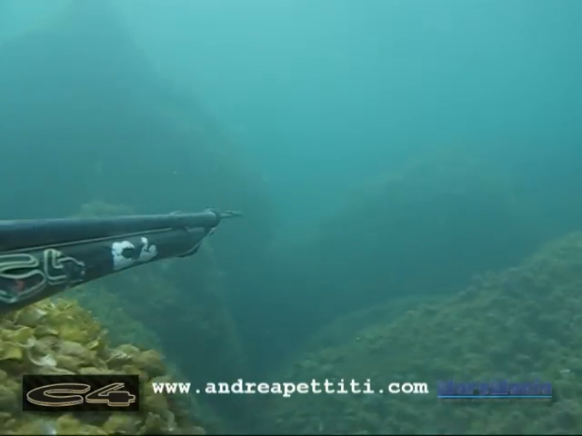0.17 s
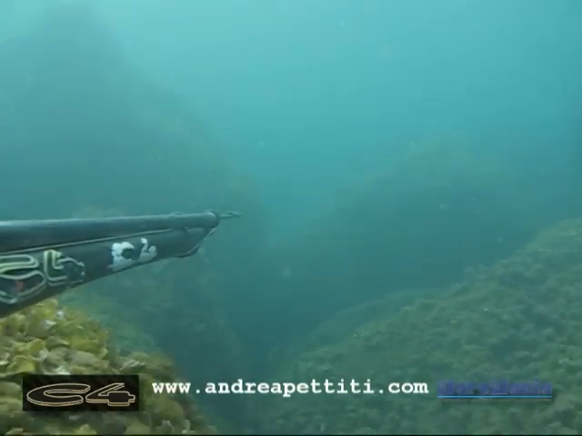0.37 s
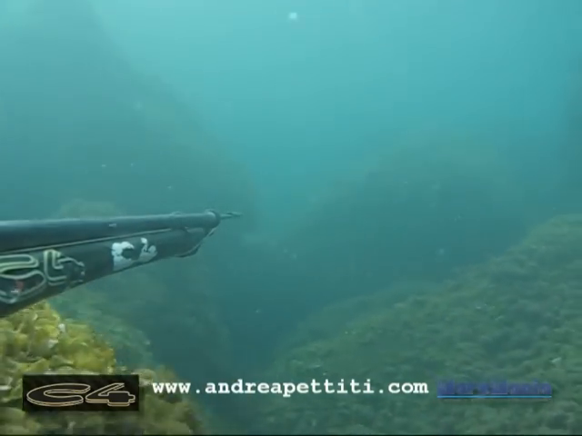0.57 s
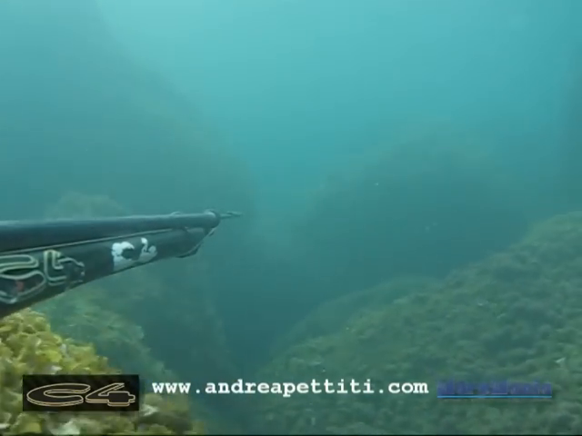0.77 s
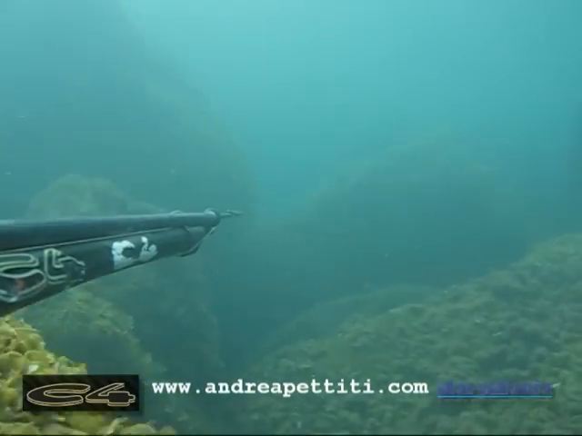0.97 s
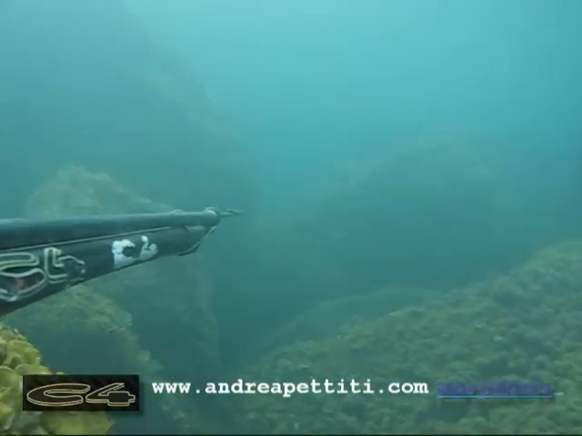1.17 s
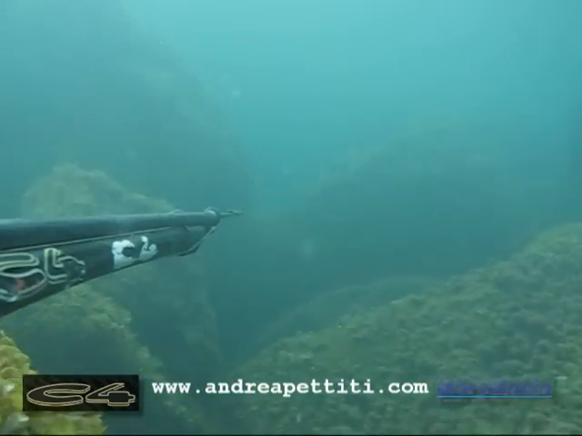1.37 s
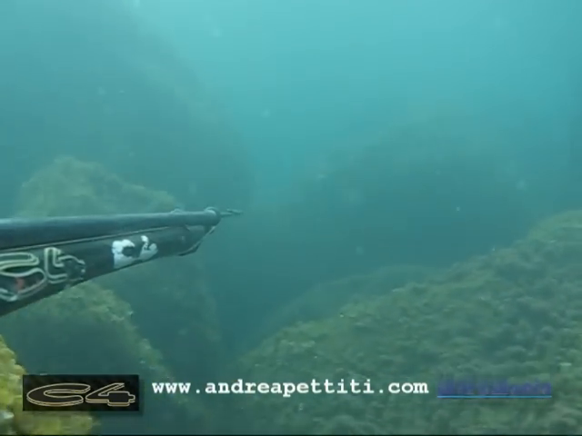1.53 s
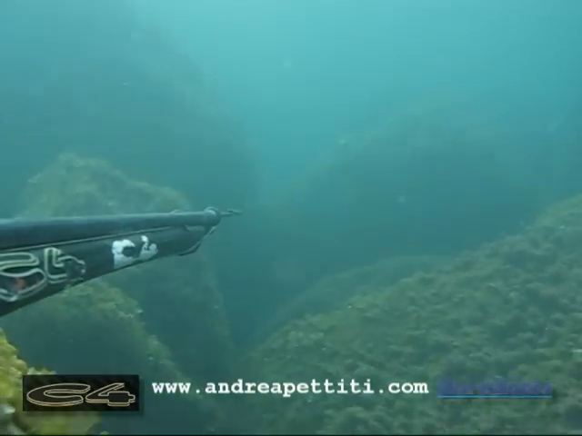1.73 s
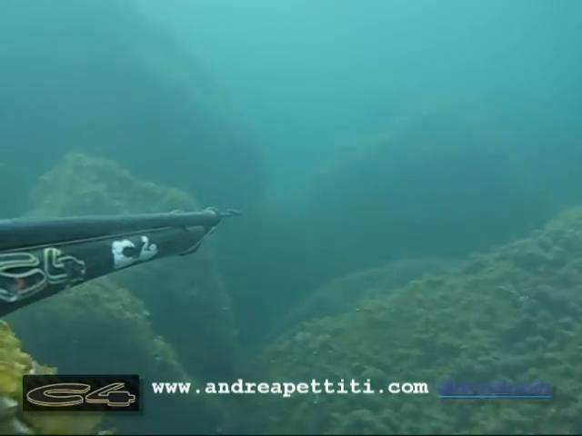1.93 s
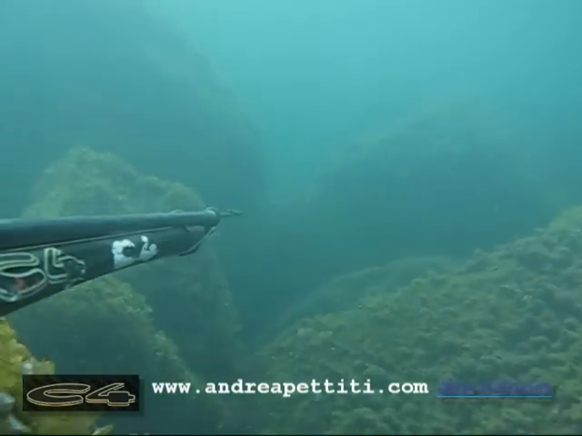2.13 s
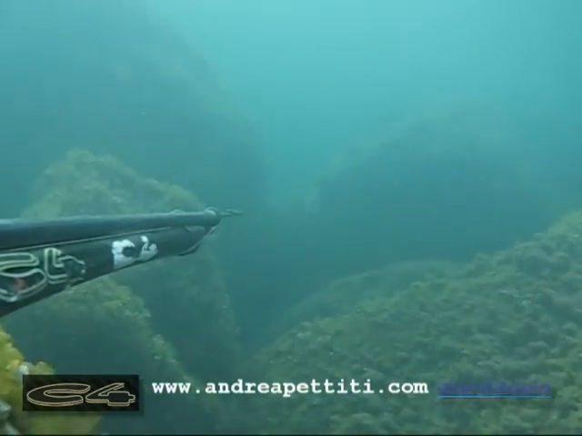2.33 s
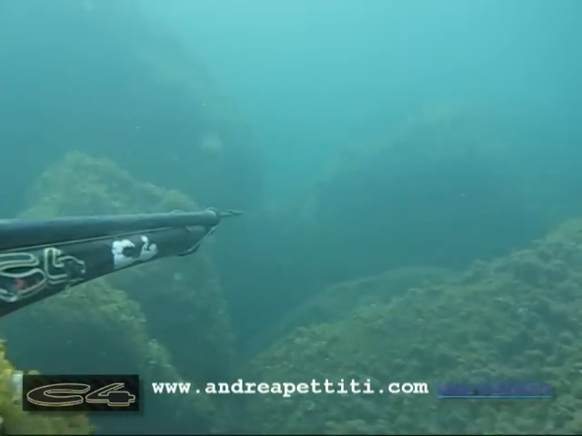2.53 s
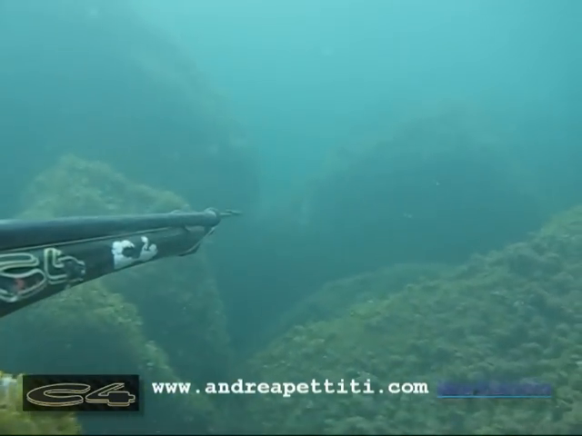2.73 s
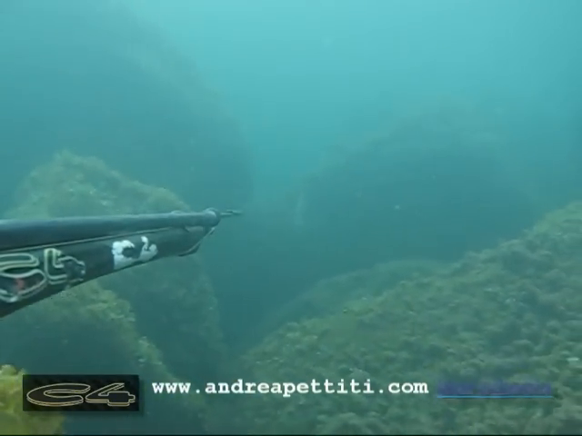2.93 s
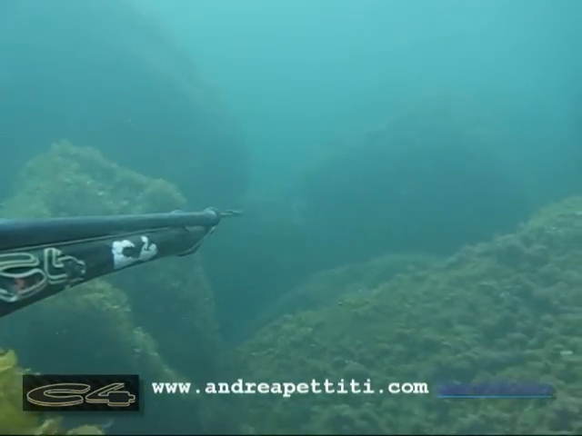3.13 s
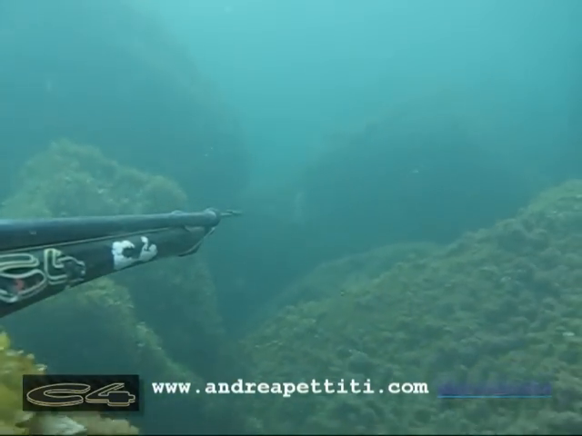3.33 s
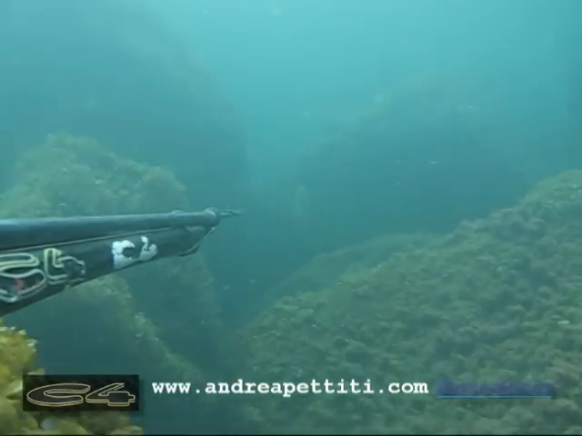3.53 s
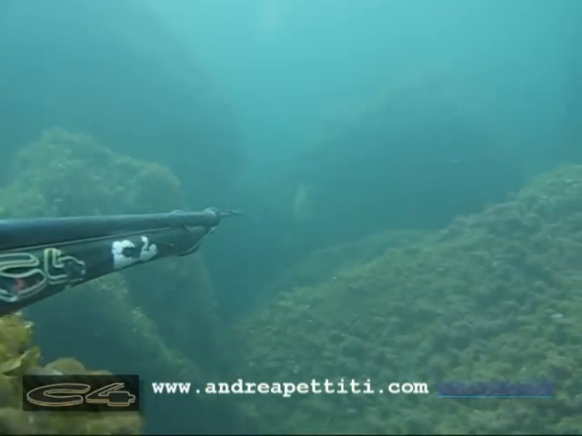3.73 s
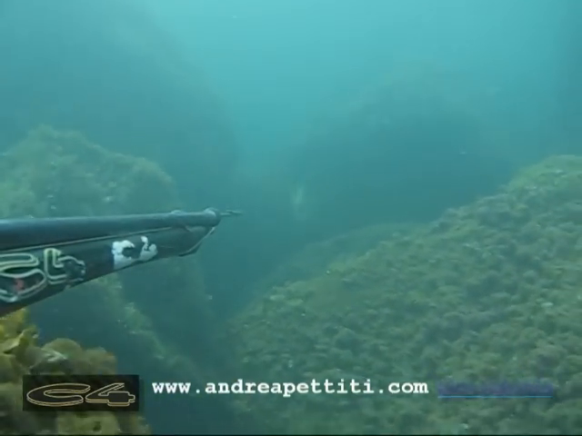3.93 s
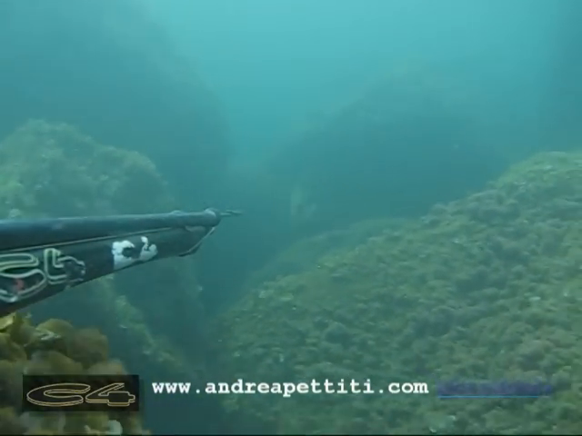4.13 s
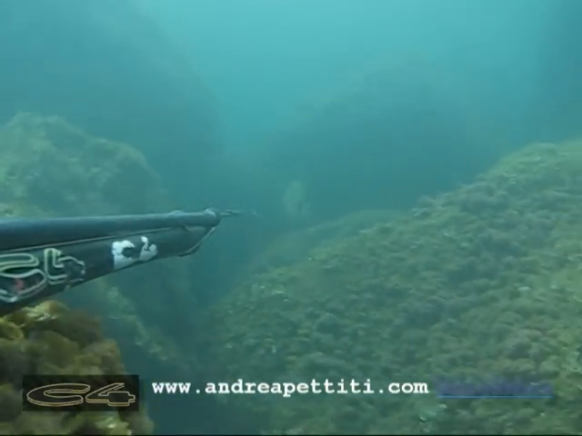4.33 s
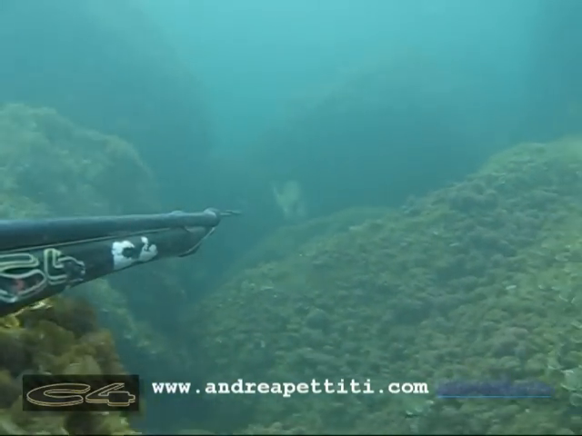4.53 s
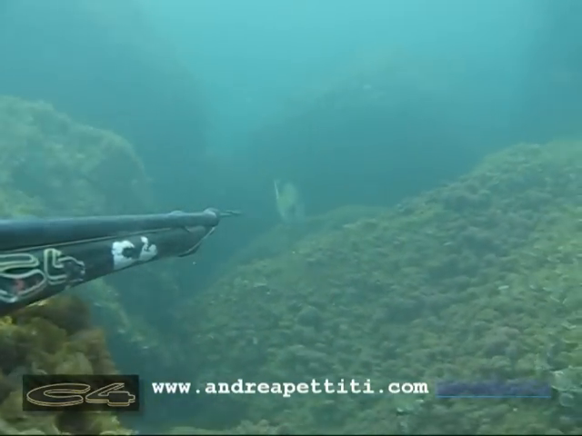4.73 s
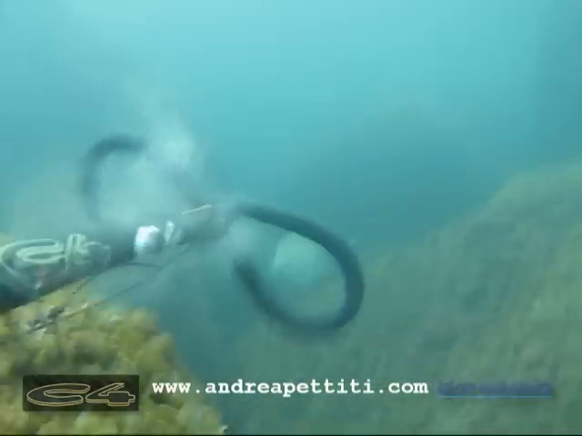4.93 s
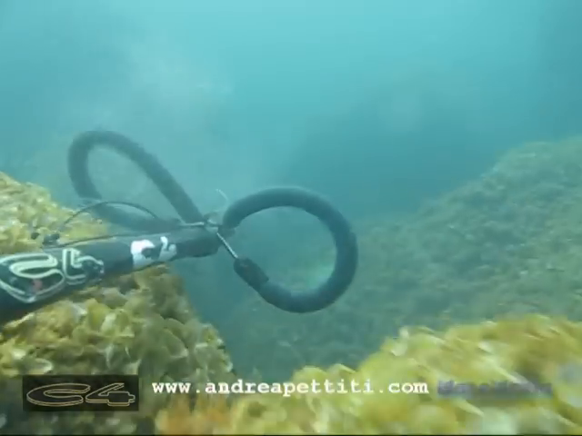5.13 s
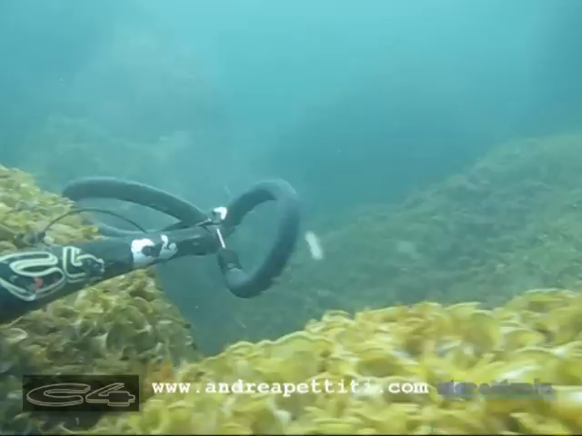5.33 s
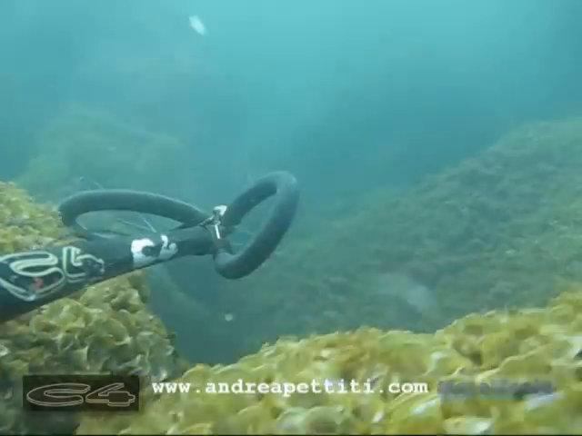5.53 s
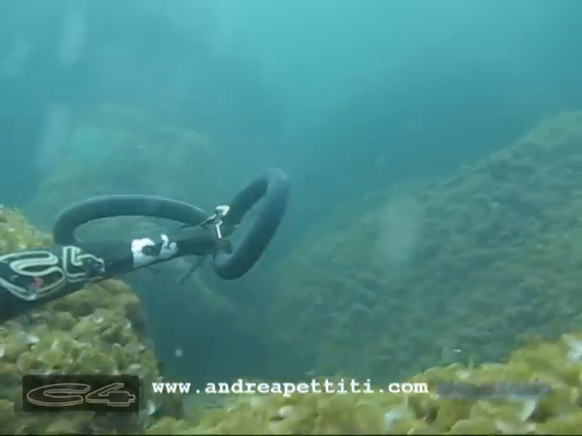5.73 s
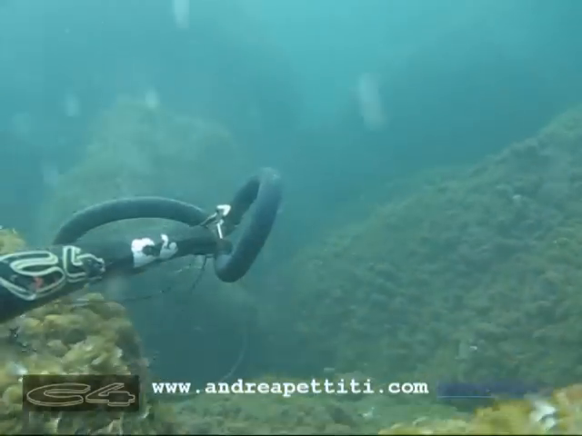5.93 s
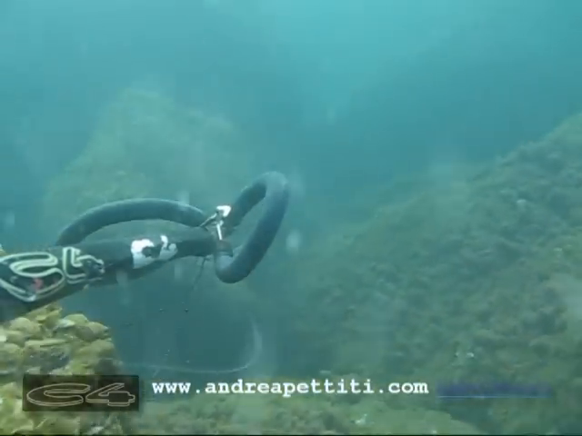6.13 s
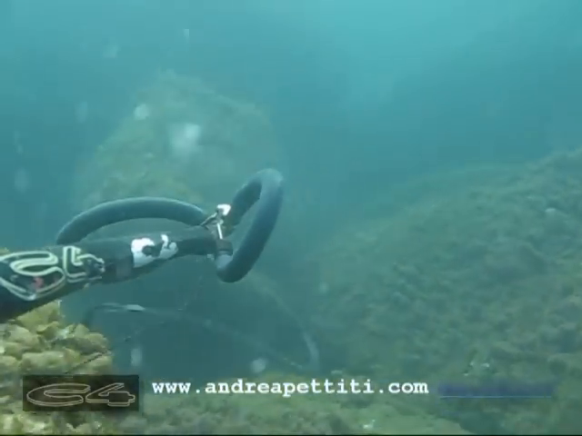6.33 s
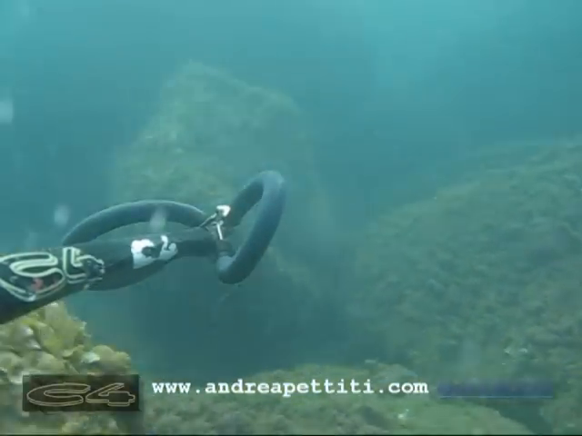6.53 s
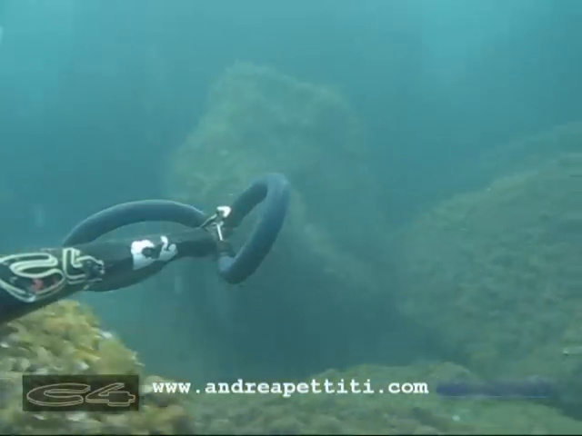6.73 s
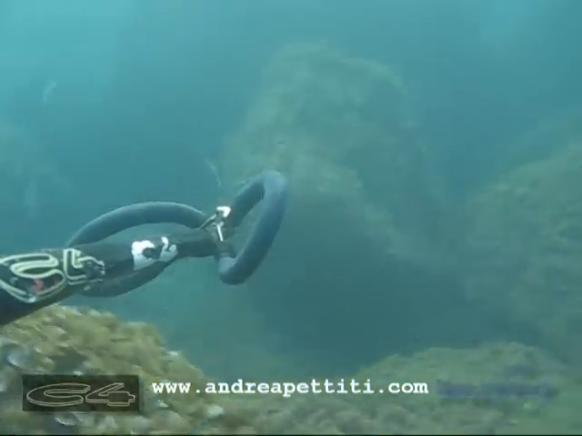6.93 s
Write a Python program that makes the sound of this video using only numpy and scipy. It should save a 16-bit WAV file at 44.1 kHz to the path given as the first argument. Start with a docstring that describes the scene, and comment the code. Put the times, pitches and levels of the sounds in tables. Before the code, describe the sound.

A sealed microphone underwater, close to a handheld speargun, gives a boxy, midrange sound with a tight doubled echo. From 0 s a fine frying crackle of distant shrimp continues, over a very faint high whine and low, trembling rumble. Sharp near snaps stand out, strong around 0.26, 1.0 and 3.7 s. Soft rapid taps chatter from 0.1 to 0.5 s and more faintly until 0.9 s; a faint swish and two dull knocks come near 1.9 s. It stays fairly calm until 4.82 s, when the gun fires: a violent, clipped thump and metallic rattle lasting about 0.15 s. The crackle is briefly stunned, then returns. Hollow knocks follow from 5.04 to 5.7 s, hardest near 5.5, with rubbing and faint low rubber groans. Dull watery swishes at 6.3 and 6.7 s come with scrapes and a bump; low rumble swells around 6.9 s before the crackle continues to 7.1 s.

```python
"""A diver lies among rocks holding a speargun with a camera in a sealed housing, then fires.
Camera tones and far shrimp snaps (smeared noise bursts) lie under near snaps (cracks, rings, echoes).
The grip trembles (low noise) and chatters, rubs and knocks on the housing (resonances, damped modes).
The gun swishes once before the shot at 4.82 s and twice after it; the shot overloads the microphone
(a rounded clipper), bands groan after it. All of it is heard twice, 3.8 ms apart."""
import sys
import numpy as np
from scipy import signal
from scipy.fft import rfft, irfft, next_fast_len
from scipy.io import wavfile
from scipy.ndimage import uniform_filter1d

SR = 44100
rng = np.random.default_rng(int(sys.argv[2]) if len(sys.argv) > 2 else 0)


def magnitude_from_level(level_db):
    """Linear magnitude for a level in decibels (20 dB per decade)."""
    exponent = np.asarray(level_db, float) / 20
    return 10 ** exponent


def inscribe(sig):
    """Save sig as 16-bit PCM at rate SR to the path in sys.argv[1].

    A 1-D sig is mono; a 2-D sig holds one channel per row.
    Samples are clipped to [-1, 1] before scaling.
    """
    pcm = np.round(np.clip(np.atleast_2d(sig).T, -1, 1) * 32767)
    wavfile.write(sys.argv[1], SR, pcm.astype(np.int16))


N = 312669
T = np.arange(N) / SR

# How the housing passes water-borne sound. Each row: frequency in Hz, gain in dB.
HOUSING_RESPONSE = [(300, -18.5), (900, -8.5), (1500, -4.5), (1750, -5.5), (2250, 0), (2700, -3),
                    (2950, -9), (3300, -4), (4000, -6.5), (4500, -8.5), (5100, -12), (5500, -17.5),
                    (5900, -14.5), (7600, -22.5)]


def rms_one(x):
    """Scales to unit rms."""
    return x / np.sqrt(np.mean(x ** 2) + 1e-20)


def in_time(rows):
    """Interpolates the columns of a time curve at every sample."""
    s, *columns = np.transpose(rows)
    return [np.interp(T, s, c) for c in columns]


def colour(x, points):
    """Causal minimum-phase filter through (Hz, dB) points, by the folded cepstrum."""
    hz, db = np.transpose(points)
    grid_hz = np.maximum(np.fft.rfftfreq(8192, 1 / SR), 1)
    log_gain = np.interp(np.log(grid_hz), np.log(hz), db) * np.log(10) / 20
    cepstrum = irfft(log_gain)
    cepstrum[1:4096] *= 2
    cepstrum[4097:] = 0
    impulse = irfft(np.exp(rfft(cepstrum)))
    return signal.fftconvolve(x, impulse)[:len(x)]


def cut(x, hz, kind, order=2):
    """Butterworth filter."""
    return signal.sosfilt(signal.butter(order, hz, kind, fs=SR, output="sos"), x)


def white():
    """White noise as long as the scene."""
    return rng.standard_normal(N)


def drift(rate_hz):
    """Random drift of unit rms: straight lines between two random points per cycle of rate_hz."""
    count = int(N / SR * 100)
    return rms_one(np.interp(T * rate_hz * 2, np.arange(count), rng.standard_normal(count)))


def resonances(x, rows):
    """Parallel two-pole resonances (Hz, width in Hz, dB) with alternating signs."""
    out = 0
    for k, (hz, width_hz, db) in enumerate(rows):
        r = np.exp(-np.pi * width_hz / SR)
        poles = [1, -2 * r * np.cos(2 * np.pi * hz / SR), r * r]
        out = out + (-1) ** k * magnitude_from_level(db) * signal.lfilter([1 - r, 0, r - 1], poles, x)
    return out


def add(out, s, grain):
    """Mixes a grain in at time s."""
    at = round(s * SR)
    out[at:at + len(grain)] += grain[:N - at]


def evened(x, seconds):
    """Evens out the slow level of a narrow noise, to unit rms."""
    power = uniform_filter1d(x * x, int(seconds * SR))
    return rms_one(x / np.sqrt(power + 0.038 * np.mean(x * x)))


def humps(rows, pointed=2.4):
    """Gain from rows (start s, peak s, end s, dB): swells and sinks; low pointedness flattens the top."""
    gain = 0
    for start_s, peak_s, end_s, db in rows:
        rise = np.interp(T, [start_s, peak_s, end_s], [0, 1, 0])
        gain = gain + magnitude_from_level(db) * np.sin(np.pi / 2 * rise) ** pointed
    return gain


def whine():
    """Camera whine: faint sine tones of slightly wavering level."""
    # Camera tones. Each row: frequency in Hz, typical rms level in dB.
    tone_rows = [(3402, -63.5), (7617, -88.5)]
    out = 0
    for hz, db in tone_rows:
        out = out + magnitude_from_level(db + 0.53 * drift(7.2)) * np.sqrt(2) * np.sin(2 * np.pi * hz * T)
    return out


def far_crackle(spread_db=6.5, hiss_db=0.0, patchy_db=1.0):
    """Far snaps in clumps, smeared by echoes in four bands of colour, merging into hiss."""
    # Level of the distant crackle. Each row: time in seconds, rms level in dB.
    reef_levels = [(0, -50), (3, -51), (4.95, -51), (5.1, -58.5), (5.3, -53), (7.09, -51.5)]
    typical_snaps_per_s, smear_s = 180, 0.0051
    bands_hz = [[700, 2540], [1740, 3600], [3100, 8400], [900, 3050]]
    sizes = magnitude_from_level(spread_db * np.minimum(rng.exponential(1, N), 2.5))
    rate_per_s = typical_snaps_per_s * magnitude_from_level(4.0 * drift(8))
    born = rng.random(N) < rate_per_s / SR
    dealt = rng.integers(0, 4, N)
    decay = np.exp(-1 / (smear_s * SR))
    bursts = 0
    for k, band_hz in enumerate(bands_hz):
        smear = signal.lfilter([1], [1, -decay], sizes * born * (dealt == k))
        crackle = rms_one(cut(smear * white(), band_hz, "band", order=1))
        bursts = bursts + crackle * np.sqrt(band_hz[1] - band_hz[0])
    hiss = magnitude_from_level(hiss_db + patchy_db * drift(4)) * white()
    return magnitude_from_level(in_time(reef_levels)[0]) * rms_one(colour(rms_one(bursts) + hiss, HOUSING_RESPONSE))


def near_snaps(rows, ring_db=0.5, tail_db=-3.0, crack_s=0.0022, span=2.26, plain_db=0.5, echo_s=0.046):
    """Collapsing bubbles: a crack, a short ring and scattered rock echoes coloured round the ring's pitch."""
    out, t = np.zeros(N), T[:4000]
    for (s, db, hz), noise in zip(rows, rng.standard_normal((len(rows), len(t)))):
        # louder snaps are nearer and drier; echo_s is the echo t60 at -25 dB
        t60 = echo_s * np.exp(-0.062 * (db + 25))
        echoes = magnitude_from_level(tail_db - 60 * t / np.clip(t60, .01, .3))
        crack = noise * (np.exp(-t / crack_s) + echoes)
        crack = magnitude_from_level(plain_db) * crack + 2 * cut(crack, [hz / span, hz * span], "band", order=1)
        ring = magnitude_from_level(ring_db) * np.sin(2 * np.pi * hz * t) * np.exp(-t / 0.0029)
        grain = colour(crack + ring, HOUSING_RESPONSE)
        add(out, s, magnitude_from_level(db) * grain / np.abs(grain[:300]).max())
    return out


def swish():
    """Water swishing past as the gun is moved: smooth, dull flow noise."""
    # Gun movements. Each row: start, peak and end in seconds, rms level at the peak in dB.
    swish_rows = [(1.82, 1.92, 2.14, -51), (6.23, 6.3, 6.38, -39.5), (6.55, 6.72, 6.95, -40)]
    # Colour of the flow noise. Each row: frequency in Hz, gain in dB.
    flow_response = [(150, -23), (500, -15), (800, 1), (1100, -2), (1500, -13.5), (2200, -0.5),
                     (2900, -9.5), (4000, -20.5), (8000, -36)]
    flow = rms_one(colour(magnitude_from_level(2.0 * drift(25)) * white(), flow_response))
    return humps(swish_rows, pointed=1.97) * flow


def grip():
    """Muscle tremor shakes the housing near 20 Hz; movements add faster jolts."""
    # Unsteadiness of the grip. Each row: time in seconds, tremor level in dB, jolt level in dB.
    grip_levels = [(0.0, -55, -56), (0.06, -30.5, -52), (0.88, -33.5, -47), (1.07, -37.5, -52.5),
                   (2.54, -34, -57), (2.59, -29, -39.5), (2.7, -34.5, -53.5), (4.04, -37.5, -55.5),
                   (4.7, -28.5, -53), (4.8, -21, -45), (4.96, -25.5, -26.5), (5.11, -31, -42.5),
                   (5.26, -23, -32), (6.3, -38, -45.5), (6.37, -24.5, -44), (6.55, -37.5, -50.5),
                   (6.87, -26.5, -26), (6.94, -17.5, -40), (7.09, -39, -51)]
    waver_db = 2.5
    tremor_db, jolt_db = in_time(grip_levels)
    tremor = cut(cut(white(), [15, 30], "band", order=1), 21.2, "low")
    jolts = cut(white(), [35., 70.], "band") + 0.32 * cut(white(), [90., 135.], "band")
    tremor_gain = magnitude_from_level(tremor_db + waver_db * drift(5))
    jolt_gain = magnitude_from_level(jolt_db + waver_db * drift(6.5))
    return tremor_gain * evened(tremor, 0.096) + jolt_gain * evened(jolts, 0.015)


def bumps(cycles=1.06):
    """Soft contacts through the grip: a fast-decaying low sine with a little grit."""
    # Dull bumps. Each row: start in seconds, relative level in dB, frequency in Hz.
    bump_rows = [(0.205, -31, 96), (0.56, -40.5, 174), (0.596, -39.5, 96), (0.801, -42, 92),
                 (1.099, -38, 106), (2.01, -42.5, 159), (2.572, -39, 202), (4.775, -34, 30),
                 (5.276, -44, 105.5), (6.342, -33, 91.48)]
    out, t = np.zeros(N), T[:6000]
    for (s, db, hz), noise in zip(bump_rows, rng.standard_normal((len(bump_rows), len(t)))):
        grit = 1.33 * cut(noise, [120, 600], "band")
        thud = np.sin(2 * np.pi * hz * t) + grit
        add(out, s, magnitude_from_level(db + 8.5) * thud * np.exp(-t * hz / cycles))
    return out


def rubbing(lumpy_db=3.0):
    """Lumpy friction noise rings the shell, grit rings its upper modes."""
    # Rubbing on the housing. Each row: time in seconds, friction level in dB, grit level in dB.
    rub_levels = [(0, -54, -57.5), (.5, -50.5, -58.5), (1.1, -59, -66.5), (1.45, -51.5, -60.5),
                  (1.8, -54, -62.5), (2.05, -44.5, -59.5), (2.4, -52, -60.5), (2.7, -58.5, -64.5),
                  (3.9, -56, -61.5), (4.1, -52.5, -63), (4.75, -58.5, -60), (5.0, -48, -59),
                  (5.14, -50.5, -72), (5.22, -42, -54.5), (5.6, -49.5, -63), (5.9, -43, -52),
                  (6.0, -52, -61.5), (6.1, -42, -53), (6.22, -47, -55), (6.3, -33, -49), (6.42, -51, -62),
                  (6.55, -55.5, -64), (6.65, -43.5, -45), (6.87, -32.5, -57.5), (7.0, -55, -59.5)]
    # Shell resonances under friction. Each row: frequency in Hz, width in Hz, gain in dB.
    shell_resonances = [(245.6, 187, -10), (325, 160, -3), (499.7, 167.6, 3), (527.3, 85, 4.5)]
    # Upper resonances under grit. Each row: frequency in Hz, width in Hz, gain in dB.
    grit_resonances = [(832, 95, -7.5), (1004, 49, -2.5), (1383, 260, -8.5)]
    low_db, grit_db = in_time(rub_levels)
    low = resonances(magnitude_from_level(lumpy_db * drift(30)) * white(), shell_resonances)
    grit = resonances(magnitude_from_level(lumpy_db * drift(40)) * white(), grit_resonances)
    return magnitude_from_level(low_db) * rms_one(cut(low, 620, "low", order=4)) + magnitude_from_level(grit_db) * rms_one(grit)


def groan():
    """Rubber bands groan against the barrel: friction noise in one low, narrow resonance, applied twice."""
    # Groans. Each row: start, peak and end in seconds, rms level at the peak in dB.
    groan_rows = [(5.15, 5.3, 5.44, -49.5), (5.75, 6.2, 6.36, -48.5)]
    # Groan resonance. Each row: frequency in Hz, width in Hz, gain in dB.
    groan_resonance = [(293.9, 51.02, 0)]
    friction = resonances(resonances(white(), groan_resonance), groan_resonance)
    return humps(groan_rows) * rms_one(friction)


def all_knocks():
    """Chatter taps and single knocks as rows (s, relative dB, Hz, t60 s, hardness dB)."""
    # Chatter of the trembling gun. Each row: first tap in seconds, number of taps, relative level in dB,
    # extra gain of the first tap in dB.
    chatter_rows = [(0.095, 9, -29, -6), (0.685, 5, -39, -8)]
    # Knocks of gun and hand. Each row: time in seconds, relative level in dB, t60 in seconds, hardness in dB.
    knock_rows = [(1.935, -33.5, 0.058, -24), (1.965, -27.5, 0.12, -29), (2.166, -34, 0.16, -23),
                  (4.038, -34, 0.032, -27), (4.964, -39.5, 0.11, 9), (4.989, -36, 0.11, -7),
                  (5.041, -11.5, 0.02, -16.5), (5.085, -42, 0.039, 6), (5.162, -32, 0.051, 1),
                  (5.2, -19, 0.039, -10), (5.214, -27.5, 0.031, -22), (5.291, -26, 0.045, -15),
                  (5.347, -27.5, 0.059, -0.5), (5.466, -18.5, 0.027, -18), (5.494, -9.5, 0.034, -6),
                  (5.66, -22, 0.039, -8.5), (5.85, -36, 0.048, -10), (6.346, -27, 0.038, -9),
                  (6.589, -27.5, 0.033, -10.5)]
    tap_gap_s, tap_hz, tap_t60_s, tap_hard_db, tap_spread_db = 0.05, 516.5, 0.053, -15.5, 0.5
    shell_hz, detune_share = 498.8, 0.011  # main shell mode; its spread with the place of the grip
    taps = []
    for s, count, db, first_db in chatter_rows:
        for k in range(round(count)):
            tap_db = db + first_db * (k == 0)
            taps.append((s + k * tap_gap_s, tap_db, tap_hz, tap_t60_s, tap_hard_db))
    taps = taps + rng.standard_normal((len(taps), 1)) * [0, tap_spread_db, 0, 0, 0]
    single = []
    for s, db, t60, hard_db in knock_rows:
        hz = shell_hz * (1 + detune_share * rng.standard_normal())
        single.append((s, db, hz, t60, hard_db))
    return np.vstack([taps, single])


def knocks(rise_s=0.0012, bend=1.48, tick_db=-14.5):
    """A tick, then the main shell mode, damped ever faster by water; hard knocks wake the other modes."""
    # Other modes of the housing, one below and three above the main pitch.
    # Each row: ratio to the main pitch, level in dB, share of the knock's t60.
    shell_modes = [(0.574, -6, 0.84), (1.603, -8.5, 0.95), (2.076, -2.5, 0.81), (2.6, -10.5, 0.32)]
    out, t = np.zeros(N), T[:9000]
    rows = all_knocks()
    ticks = rng.standard_normal((len(rows), len(t))) * np.exp(-t / 0.0013)
    phases = rng.uniform(0, 2 * np.pi, (len(rows), 5))
    for (s, db, hz, t60, hard_db), phase, tick in zip(rows, phases, ticks):
        grain = np.sin(2 * np.pi * hz * t + phase[4]) * magnitude_from_level(-60 * (t / t60) ** bend)
        for (ratio, mode_db, share), p in zip(shell_modes, phase):
            mode_gain = magnitude_from_level(mode_db + hard_db - 60 * (t / (t60 * share)) ** bend)
            grain += mode_gain * np.sin(2 * np.pi * hz * ratio * t + p)
        add(out, s - .004, magnitude_from_level(db - 3.0) * grain * (1 - np.exp(-t / rise_s)) ** 2)
        add(out, s - .006, magnitude_from_level(db + tick_db) * colour(tick, HOUSING_RESPONSE))
    return out


def shot(around, swing_hz=63.4, swing_db=-8.0, swing_s=0.04):
    """Recoil swing and shaft rattle drive the microphone to its stops, masking all but the clashing steel."""
    # Shaft and line rattling out. Each row: start, peak and end in seconds, level in dB.
    # The second row ends ahead of its peak: that burst breaks off while rising.
    blast_rows = [(4.821, 4.846, 4.88, -27), (4.856, 4.87, 4.866, -12), (4.877, 4.887, 4.898, -11),
                  (4.897, 4.91, 4.933, -15.5), (4.939, 4.946, 4.957, -21), (4.96, 4.966, 5.04, -39)]
    # Colour of the rattle. Each row: frequency in Hz, gain in dB.
    rattle_response = [(100, -16), (250, -2), (480, 4), (650, -6.5), (850, -5), (1500, -11.5),
                       (2600, -10.5), (4000, -26.5), (8000, -58.5)]
    # Clashing steel parts. Each row: start in seconds, peak level in dB, ring frequency in Hz.
    clash_rows = [(4.8208, -18, 2370), (4.8454, -16.5, 2550), (4.9468, -25, 2470), (5.0392, -25.5, 2100)]
    fire_s, stunned_s, recover_s = 4.8215, 0.131, 0.055
    stop_db, stop_gives = -24, 0.31  # headroom while stunned; share of the bursts by which it widens
    steady_push = 0.12
    t = np.maximum(T - fire_s, 0)
    damped = (t > 0) * np.exp(-(t / swing_s) ** 4)
    swing = -magnitude_from_level(swing_db) * np.sin(2 * np.pi * swing_hz * t) * damped
    # trigger parts ring each time the swing changes sign
    crossing = np.cos(2 * np.pi * swing_hz * t) ** 2 > .9
    release = signal.lfilter([1], [1, -.96], (t > 0) * (t < .036) * crossing)
    clank = 0.0045 * release * cut(white(), [1900., 3200.], "band", order=1)
    bursts = humps(blast_rows, pointed=0.36)
    rattle = bursts * rms_one(colour(magnitude_from_level(3.0 * drift(45)) * white(), rattle_response))
    stunned = np.interp(T - fire_s, [-.008, 0, stunned_s, stunned_s + recover_s], [0, 1, 1, 0])
    push_times_s = [swing_s, swing_s + 0.01, stunned_s - .015, stunned_s]
    push = steady_push * np.interp(t, push_times_s, [0, 1, 1, 0])
    top = magnitude_from_level(stop_db * stunned) + stop_gives * bursts + 0.18 * magnitude_from_level(swing_db) * damped
    drive = (around * magnitude_from_level(-8.0 * damped) + swing + clank + push + rattle) / top
    stopped = top * drive / (1 + drive ** 4) ** .25  # stop with a rounded knee
    clashes = near_snaps(clash_rows, echo_s=0.034, plain_db=-14.0)
    return cut(stopped + clashes, 15.7, "high", order=1)


def scene():
    """All sources at one microphone."""
    # Loudest near shrimp snaps. Each row: start in seconds, peak level in dB, ring frequency in Hz.
    snap_rows = [(0.134, -27, 1920), (0.2599, -14.5, 2100), (0.5093, -23.5, 2260), (0.5187, -21, 2080),
                 (0.636, -33, 2550), (0.7202, -23, 1910), (0.772, -22, 2060), (0.901, -33, 1900),
                 (0.9369, -22.5, 2670), (0.9955, -13.5, 2400), (1.0775, -33, 2250), (1.1676, -23, 2200),
                 (1.5183, -24, 2270), (1.558, -35.5, 2290), (1.851, -29, 2430), (2.0505, -29.5, 2670),
                 (2.1306, -30.5, 2160), (2.1947, -30.5, 3270), (2.3999, -28, 2420), (2.631, -32, 1870),
                 (2.849, -33.5, 3300), (3.0603, -24.5, 4660), (3.4322, -31, 3270), (3.4652, -29, 1280),
                 (3.6473, -33.5, 2140), (3.717, -11, 2860), (3.7848, -25, 2230), (4.1513, -33, 1920),
                 (4.31, -27, 2160), (4.6221, -27.5, 2280), (5.02, -27.5, 2710), (5.195, -31, 2060),
                 (5.3685, -21.5, 3349), (5.3, -33, 2300), (5.4586, -31, 2500), (5.5844, -33.5, 3000),
                 (5.5646, -29.5, 3970), (5.906, -24.5, 2370), (5.9713, -34.5, 4600), (6.2178, -34, 2680),
                 (6.266, -31.5, 4800), (6.302, -28, 2190), (6.0655, -20, 2650), (6.369, -33.5, 1460),
                 (7.005, -31.5, 2700)]
    around = whine() + far_crackle() + near_snaps(snap_rows) + swish()
    around = around + grip() + bumps() + rubbing() + groan() + knocks()
    return shot(around)[None]


def roll_off(x):
    """The treble ends steeply here."""
    return signal.sosfilt(signal.butter(12, 16660, fs=SR, output="sos"), x)


def record(dry):
    """Narrow-band track plus a late twin, as if stretched from half rate: combed, with its top mirrored."""
    twin_lag_samples, twin_db, mirror_db = 166.25, -5.5, -1.5
    track = colour(dry[0], [(7700, -0.5), (8100, -8.5), (8900, -9.5), (9300, -26), (11000, -23.5)])
    # alternating signs flip the spectrum about a quarter of the sample rate
    mirror = cut(track * (-1.) ** np.arange(N), 15800, "low", order=24)
    size = next_fast_len(N + 512)
    late = np.exp(-2j * np.pi * np.fft.rfftfreq(size) * twin_lag_samples)
    twin = irfft(late * rfft(track + magnitude_from_level(mirror_db) * mirror, size), size)[:N]
    noise_floor = magnitude_from_level(-100) * white()
    mix = (track + magnitude_from_level(twin_db) * twin + noise_floor)[None]
    return roll_off(mix)


dry = scene()
out = record(dry)
inscribe(out)
```